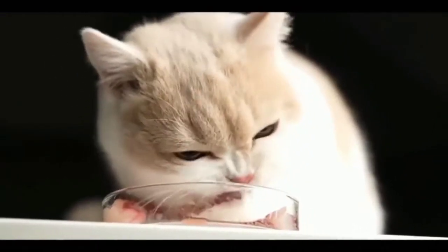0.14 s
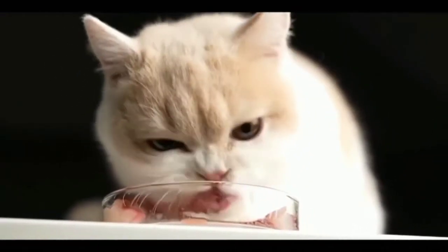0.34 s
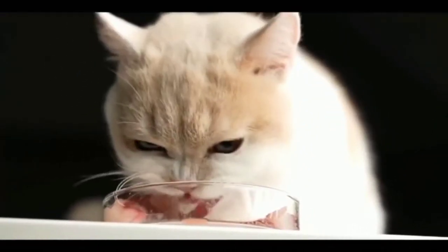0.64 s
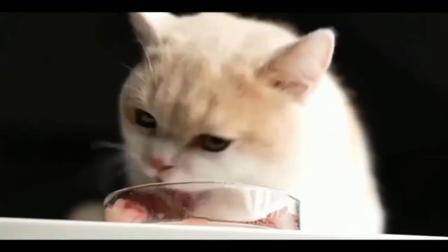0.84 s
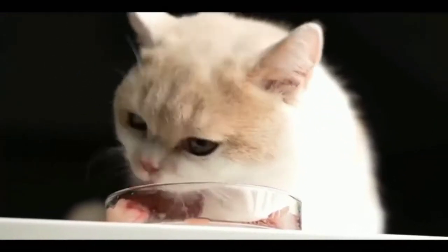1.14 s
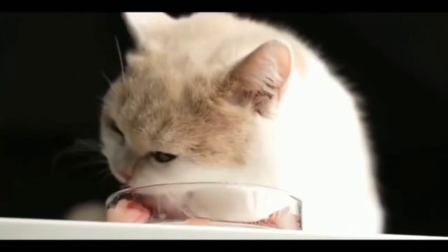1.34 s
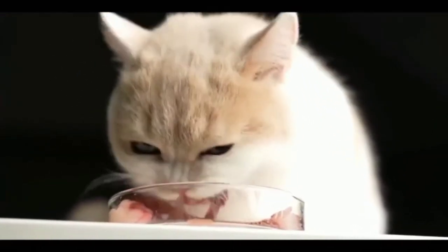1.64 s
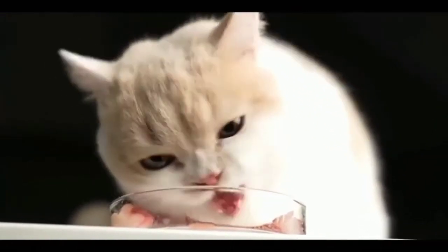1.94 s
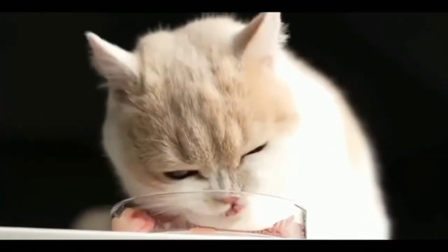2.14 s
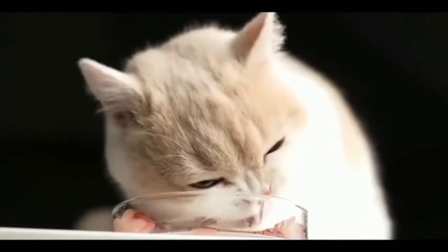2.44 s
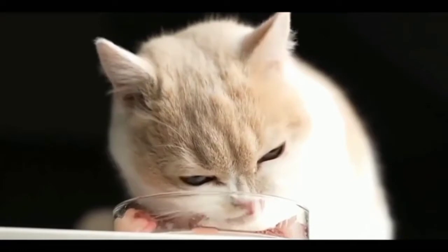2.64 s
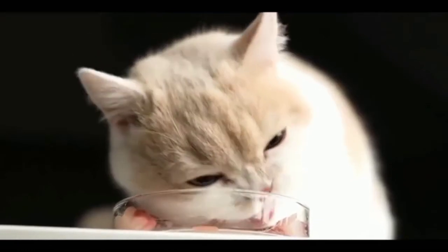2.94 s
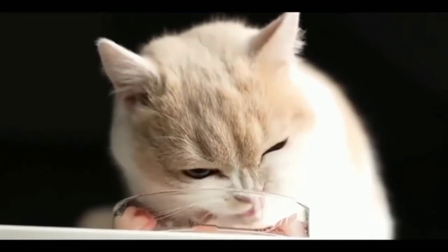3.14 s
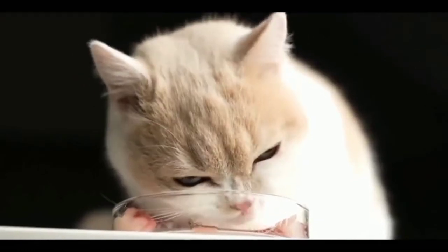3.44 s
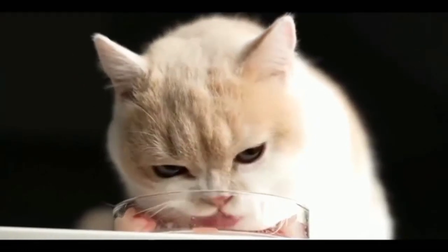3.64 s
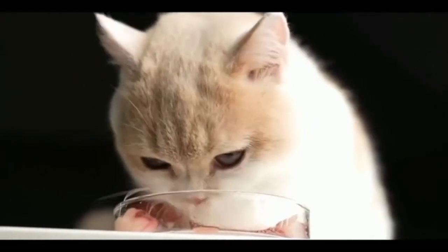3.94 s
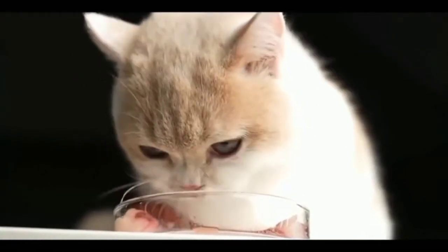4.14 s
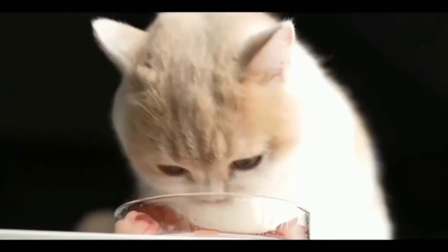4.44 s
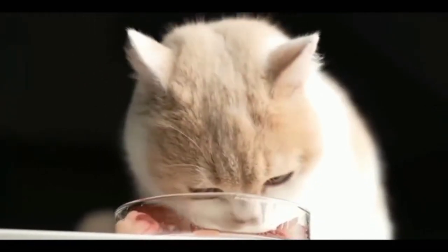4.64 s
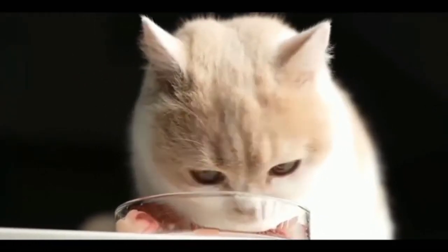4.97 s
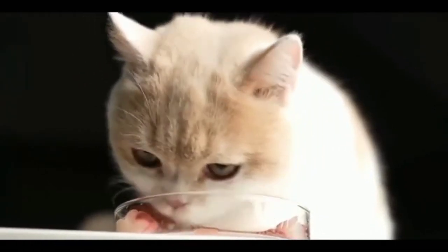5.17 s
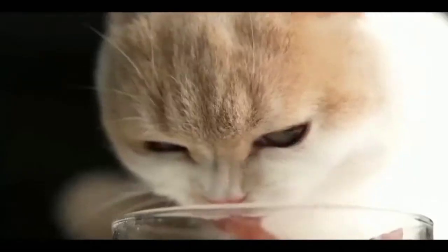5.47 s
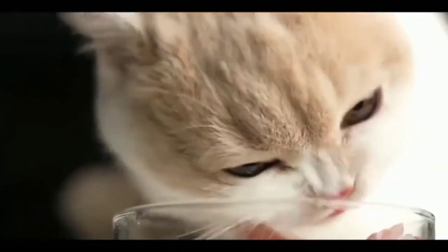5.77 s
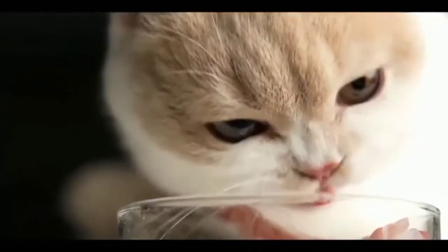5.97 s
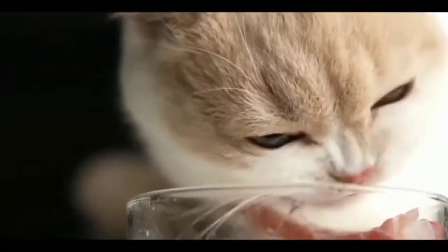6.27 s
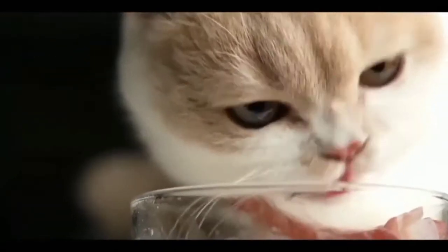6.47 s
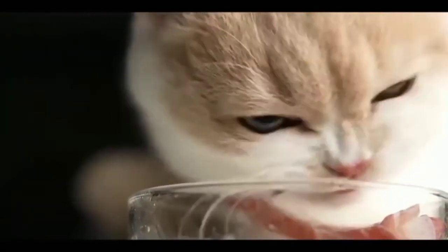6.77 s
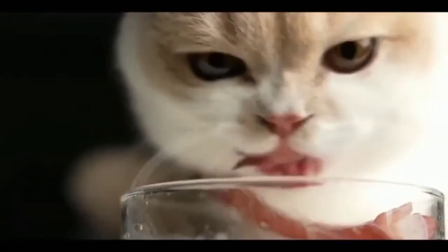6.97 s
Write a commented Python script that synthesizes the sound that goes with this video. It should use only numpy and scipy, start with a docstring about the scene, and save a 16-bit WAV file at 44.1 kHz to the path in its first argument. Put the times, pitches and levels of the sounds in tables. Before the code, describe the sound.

A kitten chews raw meat from a glass dish in a quiet room. Quick, irregular wet pops and sharp saliva clicks run throughout, with crackling, juicy bites and soft squelching between them. Now and then its jaw knocks dully through the dish and table. The chewing eases briefly past the middle, then returns strongly. The microphone is very close, with a short room echo.

```python
"""A kitten chews raw meat with wet pops, each a small break that makes its mouth ring. Saliva ticks, bites
squeeze out crackling juice and the meat squelches in between; now and then a short, narrow hiss sounds high in
the treble. The jaw thuds through a glass dish and the table under it. The microphone is close, so the loudest
clicks overload it. Behind all this are the short echo and faint rumble of a quiet room."""
import sys
import numpy as np
from scipy import signal
from scipy.fft import next_fast_len
from scipy.io import wavfile
from scipy.ndimage import uniform_filter1d

SR = 44100
rng = np.random.default_rng(int(sys.argv[2]) if len(sys.argv) > 2 else 0)


def dump(signal):
    """Clip the signal to [-1, 1] and save it as 16-bit WAV at the path in sys.argv[1]."""
    limited = np.clip(np.atleast_2d(signal).T, -1, 1)
    pcm = np.round(limited * 32767).astype(np.int16)
    wavfile.write(sys.argv[1], SR, pcm)


N = 313551


def undb(db):
    """Turns decibels into a number to multiply by."""
    return 10 ** (np.asarray(db) / 20)


def level(x, db):
    """Sets a sound's average (RMS) level."""
    return x * undb(db) / np.sqrt(np.mean(x ** 2))


def band(x, hz, width_hz):
    """Lets a sound ring around one pitch and turns the rest down."""
    return signal.lfilter(*signal.iirpeak(min(hz, .45 * SR), hz / width_hz, fs=SR), x)


def waver(per_s):
    """A curve that glides to a new random value per_s times a second."""
    step = int(SR / per_s)
    return uniform_filter1d(np.repeat(rng.standard_normal(N // step + 1), step), step)[:N]


def add(out, peak_s, sound, peak_db):
    """Mixes a sound in so that its peak has the given time and level."""
    start = max(int(peak_s * SR) - np.abs(sound).argmax(), 0)
    sound = sound[:N - start]
    out[start:start + len(sound)] += sound * undb(peak_db) / np.abs(sound).max()


def sharp_break(spread_ms, snap):
    """One sharp break, with a spatter of smaller ones just before and after it."""
    t = (np.arange(1024) - 400) / SR / max(spread_ms / 1000, 1e-4)
    spatter = rng.standard_normal(1024) * np.exp(-np.where(t < 0, -0.75 * t, t) ** 2)
    spatter[400] += snap * np.sign(spatter[400])
    return spatter


def grains(samples, per_s, spread_db, hiss):
    """Scattered tiny breaks of unequal size over a wet hiss."""
    hit = rng.random(samples) < per_s / SR
    size_db = spread_db * np.minimum(rng.exponential(size=samples), 4)
    return hit * rng.choice([-1, 1], samples) * undb(size_db) + hiss * rng.standard_normal(samples)


def rumble():
    """A faint, deep rumble comes and goes."""
    flutter = undb(0.98 * waver(53))
    deep_noise = band(band(rng.standard_normal(N), 26, 19.5), 60, 90)
    return level(flutter * deep_noise, db=-67)


# The bands of the room's echo: pitch_hz, width_hz, fade_s (time to fall 60 dB), level_db
ECHO_BANDS = [(230, 250, 0.75, -8.5), (647, 800, 0.26, -14.5), (1730, 1350, 0.61, -13),
              (4900, 7900, 0.49, -16.5), (8050, 8100, 0.016, -6.5)]
def room_echo(x):
    """Dish, table and walls answer with fading noise in which the bass lasts longest."""
    t = np.arange(SR // 2) / SR
    tail = 0
    for pitch_hz, width_hz, fade_s, level_db in ECHO_BANDS:
        fade = undb(-60 * t / fade_s) * (1 - np.exp(-t / 0.0032))
        noise = band(band(rng.standard_normal(len(t)), pitch_hz, width_hz), pitch_hz, 2.17 * width_hz)
        tail = tail + undb(level_db) * noise * fade / np.sqrt(np.sum(fade ** 2))
    echo = signal.fftconvolve(x, tail)[:N]
    # the echo's phase drifts at random, so no pitch rings on
    phase_drift = np.exp(2.5j * waver(25))
    return np.real(signal.hilbert(echo, next_fast_len(N))[:N] * phase_drift)


# Short, high hisses (the one at 6.19 s is a wet lick): middle_s, length_ms, level_db
HIGH_HISSES = [(0.6, 67, -44), (1.31, 28, -37.5), (1.48, 18, -28.5), (3.235, 10, -36), (3.738, 51, -36.5),
               (5.305, 36, -46), (6.191, 46, -35)]
def high_hisses(pitch_hz=7420, width_hz=2200):
    """A narrow, grainy hiss comes and goes high in the treble."""
    t = np.arange(N) / SR
    swells = sum(undb(level_db) * np.exp(-((t - middle_s) / (length_ms / 2000)) ** 4)
                 for middle_s, length_ms, level_db in HIGH_HISSES)
    hiss = grains(N, per_s=3000, spread_db=2, hiss=.4)
    return swells * level(band(band(hiss, pitch_hz, width_hz), pitch_hz, width_hz), 0)


def sizzle(x, pitch_hz=8800, width_hz=6500):
    """The finest wet films burst with a very high fizz."""
    return band(band(x, pitch_hz, width_hz), pitch_hz, width_hz)


# How the highest treble of the sound drops out and returns: time_s, gain_db
TOP_TREBLE_LEVELS = [(0, 7.5), (.6, -1), (1.2, 1), (1.5, 5), (2.15, 2.5), (2.5, -7.5), (3.15, 6),
                     (3.8, -13), (4.0, -1), (4.3, -32), (5.33, -23), (5.4, 4.5), (5.97, 2), (6.25, -30),
                     (6.6, 14), (6.75, -14), (7.11, 10.5)]
def top_treble_db(time_s):
    """How far the highest treble is turned up or down at this time."""
    return np.interp(time_s, *np.transpose(TOP_TREBLE_LEVELS))


# Where the hollow of the mouth and the lip opening ring: pitch_hz, width_hz, gain_db
MOUTH_RINGS = [(755, 810, 0.5), (1957, 1100, -2.5)]
LIP_RINGS = [(2540, 1160, 0.5), (4770, 1510, 3), (5560, 4500, -4.5)]
MOUTH_TOP_HZ, LIP_TOP_HZ = 3840, 7030
def muffled_ring(x, rings, top_hz):
    """Mouth or lips ring, and wet flesh muffles what lies above top_hz."""
    ringing = sum((-1) ** k * undb(gain_db) * band(x, pitch_hz, width_hz)
                  for k, (pitch_hz, width_hz, gain_db) in enumerate(rings))
    return signal.lfilter(*signal.butter(4, top_hz, fs=SR), ringing)


def crackle(rings, top_hz):
    """Each tiny break sets off just one of the rings, so the clicks differ in pitch."""
    clicks = sum(muffled_ring(grains(N, per_s=110, spread_db=4.5, hiss=.075), [ring], top_hz)
                 for ring in rings)
    return level(clicks, 0)


# How loud the meat squelches: time_s, mouth_db, treble_db
SQUELCH_LEVELS = [(0.0, -43.5, -51.5), (0.42, -49.5, -49.5), (0.75, -41.5, -48), (1.62, -43, -46.5),
                  (1.802, -44, -49.5), (2.93, -42, -40.5), (3.15, -47, -45.5), (3.98, -46.5, -46.5),
                  (4.22, -37.5, -57), (5.269, -59.5, -58), (5.6, -38, -48), (5.92, -39, -45.5),
                  (7.11, -51.5, -59)]
def squelch():
    """Juice seeps through the meat as patchy crackle; a wider mouth lets more treble out."""
    t = np.arange(N) / SR
    time_s, mouth_db, treble_db = np.transpose(SQUELCH_LEVELS)
    mouth_gain, treble_gain = (undb(np.interp(t, time_s, db) + 3.5 * waver(45) + 4 * waver(14))
                               for db in (mouth_db, treble_db))
    fizz = grains(N, per_s=400, spread_db=3, hiss=.25)
    mouth = crackle(MOUTH_RINGS, MOUTH_TOP_HZ)
    lips = crackle(LIP_RINGS, LIP_TOP_HZ)
    films = level(sizzle(fizz) * undb(1.7 * waver(3.8)), -16.5) * undb(top_treble_db(t))
    return mouth_gain * mouth + treble_gain * (lips + films)


# Blows of the jaw on dish and table: peak_s, peak_db
JAW_BLOWS = [(0.073, -33), (0.636, -17), (0.7237, -18.5), (0.9274, -26), (0.963, -18), (1.3656, -15),
             (1.408, -24), (1.49, -26.5), (1.5295, -23.5), (1.65, -18.5), (1.768, -21), (2.137, -18.5),
             (2.189, -30), (2.3233, -26.5), (2.363, -19.5), (2.616, -23.5), (2.768, -33), (3.0969, -22),
             (3.498, -12), (3.579, -15.5), (3.6031, -21), (4.0343, -17), (4.2014, -16.5), (4.2583, -20),
             (4.5413, -7), (5.482, -17.5), (5.9359, -23.5), (6.13, -32), (7.0982, -15)]
def jaw_thuds(table_hz=243.5, pitch_scatter=.13):
    """A blow gives dish and table a low note that dies fast; its hard edge knocks higher up."""
    out, t = np.zeros(N), np.arange(4096) / SR
    for peak_s, peak_db in JAW_BLOWS:
        pitch_hz = table_hz * (1 + pitch_scatter * rng.standard_normal())
        body = np.sin(2 * np.pi * pitch_hz * t) * (t / 0.00065) ** 0.9 * np.exp(-t / 0.00267)
        edge = np.sin(2 * np.pi * 2.3 * pitch_hz * t) * np.exp(-t / 0.003)
        thud = np.convolve(body + undb(-3) * edge, sharp_break(spread_ms=1.5, snap=12))
        add(out, peak_s, thud, peak_db)
    return out


# Bites that squeeze out juice: middle_s, length_ms, mouth_db, pitch_hz, treble_db
JUICY_BITES = [(0.026, 31, -74, 1560, -34), (0.085, 26, -24, 1740, -47), (0.636, 29, -25.5, 1520, -29.5),
               (0.963, 19, -17.5, 1240, -45), (1.009, 64, -27, 644, -28), (1.359, 35, -17, 606, -25),
               (1.602, 9.2, -26.5, 730, -20.5), (1.693, 54, -25.5, 1340, -38),
               (2.077, 32.3, -17.5, 610, -24.5), (2.232, 10.6, -18.5, 2150, -51),
               (2.494, 14, -21, 1890, -33), (2.531, 13, -17.5, 556, -14), (2.555, 100, -32.5, 1490, -31.5),
               (3.065, 20, -18.5, 1480, -22), (3.109, 13.3, -27, 1740, -17.5),
               (3.211, 4.8, -15.5, 1500, -20), (3.412, 50, -25, 1980, -54), (3.498, 25, -15, 690, -18.5),
               (3.824, 28, -25.5, 2060, -54), (3.857, 22, -21.5, 2080, -33), (4.1, 37, -18, 1730, -28.5),
               (4.194, 27.4, -17.5, 670, -58), (4.749, 31, -27.5, 1800, -28.5), (5.021, 18, -29, 2160, -28),
               (5.297, 28, -59, 2120, -31.5), (5.381, 20, -32, 1680, -35), (5.652, 5.5, -12, 810, -15),
               (5.763, 9.2, -13, 1460, -45), (5.973, 9.2, -16, 1400, -22), (6.271, 220, -31, 1750, -40),
               (6.272, 14.2, -17, 2070, -10), (6.678, 66, -33, 740, -32.5), (6.734, 48, -27, 1530, -28.5),
               (6.777, 16, -29, 1950, -21.5)]
def bites():
    """A burst of sticky snaps swells and fades, ringing the mouth and the lip opening."""
    samples, half = 8192, 4096
    out, t = np.zeros(N + samples), (np.arange(samples) - half) / SR
    for middle_s, length_ms, mouth_db, pitch_hz, treble_db in JUICY_BITES:
        snaps, fibres, fizz = (grains(samples, per_s=600, spread_db=4, hiss=.11) for _ in range(3))
        ring = band(band(snaps, pitch_hz, .5 * pitch_hz), pitch_hz, pitch_hz)
        mouth = level(ring + undb(-5) * muffled_ring(snaps, MOUTH_RINGS, MOUTH_TOP_HZ), mouth_db)
        lips = level(muffled_ring(0.2 * snaps + fibres, LIP_RINGS, LIP_TOP_HZ), treble_db)
        films = level(sizzle(fizz), treble_db - 11 + top_treble_db(middle_s))
        swell = np.exp(-np.abs(t / (0.53 * length_ms / 1000)) ** 1.65)
        start = int(middle_s * SR)
        out[start:start + samples] += (mouth + lips + films) * swell
    return out[half:N + half]


# Snaps of saliva and sinew: peak_s, peak_db, pitch_hz
SALIVA_TICKS = [(0.0296, -7.5, 5960), (0.1028, -19, 4730), (0.1082, -10.5, 4700), (0.3303, -19.5, 7850),
                (0.405, -17, 3030), (0.423, -2.5, 4500), (0.4655, -13.5, 5400), (0.5807, -7.5, 8100),
                (0.7923, -18, 3730), (0.8028, -8.5, 4300), (0.9517, -11.5, 3300), (1.0257, -6, 4940),
                (1.1425, -13.5, 5700), (1.18, -10, 5100), (1.1858, -6.5, 5640), (1.369, -3.5, 4870),
                (1.4163, -23, 3900), (1.4562, -1.5, 4900), (1.4651, -13, 4700), (1.4825, -8, 6100),
                (1.5484, -9, 5940), (1.615, -8.5, 4900), (1.65, -11, 4770), (1.6582, -13, 4800),
                (1.6773, -9.5, 4900), (1.777, -15.5, 4470), (1.8388, -8, 4460), (1.8904, -18, 4630),
                (1.9464, -6, 4230), (1.967, -8, 5860), (2.057, -9, 4300), (2.1824, -18.5, 3660),
                (2.3227, -4, 3600), (2.3266, 0.5, 4700), (2.461, -15, 3770), (2.533, -2.5, 4180),
                (2.5652, -7, 4630), (2.574, -10, 3900), (2.836, -19, 10900), (2.889, -6.5, 7500),
                (2.9632, -5.5, 6200), (3.0651, -3.5, 2800), (3.084, -14, 3710), (3.1137, -5.5, 5360),
                (3.1378, -14, 5600), (3.178, -14, 5100), (3.2046, -17, 4060), (3.2696, -3.5, 4300),
                (3.384, -17.5, 2820), (3.4587, -20, 3210), (3.469, -24, 3250), (3.4886, -5.5, 3006),
                (3.5404, -11, 4170), (3.628, -7, 3210), (3.6871, -6, 3800), (3.697, -7, 4100),
                (3.7194, -10.5, 4530), (3.7728, -3.5, 3520), (3.7854, -13, 3800), (3.8568, -8.5, 3280),
                (3.8676, -12, 3400), (3.8976, -21, 3200), (3.968, -18, 3580), (3.9925, -1, 4560),
                (4.111, -6, 4050), (4.153, -17.5, 4100), (4.438, -20.5, 3940), (4.5478, -9.5, 2900),
                (4.7542, -13, 2880), (4.9996, -13.5, 2940), (5.0253, -16, 3470), (5.248, -20.5, 3440),
                (5.437, -18, 5200), (5.661, -8, 6100), (5.6676, -4.5, 6400), (5.7518, -8, 4900),
                (5.7613, -0.5, 5700), (5.7683, -5.5, 5340), (5.783, -12, 4860), (5.846, -14.5, 7800),
                (5.9688, 2.5, 6670), (5.9762, 0.5, 7300), (6.0603, -8.5, 4650), (6.0742, -20, 4440),
                (6.206, -9, 8170), (6.2427, -6, 4430), (6.2498, 2, 4660), (6.286, -1, 4770),
                (6.2997, -2, 4560), (6.4253, -5, 4360), (6.5195, -8.5, 5400), (6.5352, -11.5, 4260),
                (6.6174, -9.5, 7200), (6.695, -12, 5140), (6.7046, -11.5, 5600), (6.7414, -10, 4380),
                (6.775, -15, 4170), (6.8343, 0.5, 4790), (6.9214, -4, 6350), (6.939, -14, 4100),
                (6.9485, -0.5, 4480), (6.959, -2.5, 4480), (7.003, -14.5, 5020), (7.0614, -6, 6530)]
def saliva_ticks():
    """Tiny films and fibres part: a brief high ring, the tone of the lips and a trace of sizzle."""
    out = np.zeros(N)
    for peak_s, peak_db, hz in SALIVA_TICKS:
        click = sharp_break(spread_ms=.85, snap=5)
        ring = band(band(band(click, hz, 0.31 * hz), hz, 0.55 * hz), hz, hz)
        lips = undb(-14.5) * muffled_ring(click, LIP_RINGS, LIP_TOP_HZ)
        films = undb(-24 + top_treble_db(peak_s)) * sizzle(click)
        add(out, peak_s, ring + lips + films, peak_db)
    return out


# Wet pops inside the mouth: peak_s, peak_db, pitch_hz
MOUTH_POPS = [(0.0868, -14, 1660), (0.2413, -21.5, 805), (0.273, -18, 650), (0.2835, -22.5, 740),
              (0.4045, -17, 2010), (0.422, -17, 2310), (0.5227, -18, 2030), (0.5535, 1.5, 993),
              (0.7239, -15.5, 696), (0.7923, -11.5, 880), (0.7992, -10, 945), (0.843, 3, 1745),
              (0.8675, -12, 1490), (0.9524, -4.5, 1500), (1.0073, -8, 590), (1.183, -3.5, 1930),
              (1.3354, -8.5, 1040), (1.3531, -8, 720), (1.6158, -14, 2210), (1.651, -3, 1730),
              (1.6782, -3.5, 676), (1.769, -12, 1280), (1.8891, -8.5, 1800), (1.9459, -1.5, 1420),
              (1.9666, 1, 1620), (2.0563, -4.5, 1280), (2.1377, -15.5, 970), (2.2287, -3, 1890),
              (2.3257, -11.5, 1810), (2.3586, -17.5, 1060), (2.461, -24, 1700), (2.491, -10.5, 1660),
              (2.565, -9, 2060), (2.586, -6.5, 1830), (2.671, -16.5, 827), (2.7398, -17.5, 786),
              (2.7663, -13.5, 775), (2.826, -19.5, 1760), (2.8883, -5, 1830), (2.9623, -3, 1660),
              (3.012, -16, 1710), (3.046, -15, 1500), (3.0836, -3, 1540), (3.2044, -11.5, 1630),
              (3.2705, -14, 1710), (3.5117, -7, 1620), (3.5768, -7.5, 710), (3.6278, -16, 1950),
              (3.7197, -6.5, 1910), (3.7727, -7, 2450), (3.8234, -5, 1830), (3.8575, -4, 2200),
              (3.986, -10.5, 2430), (3.9922, -6, 2080), (4.0241, -15, 2550), (4.0665, -18, 1840),
              (4.0993, -12, 844), (4.171, -6, 2200), (4.2594, -19, 457), (4.3337, -10.5, 1780),
              (4.463, -2.5, 1780), (4.5405, -5.5, 575.3), (4.6647, -17.5, 1870), (4.7175, -14, 2300),
              (4.7321, -15, 2100), (4.755, -8, 710), (4.8177, -19.5, 1680), (4.9989, -10, 2600),
              (5.113, -20.5, 2450), (5.274, -20, 2600), (5.438, -12, 1560), (5.6485, 1, 866),
              (5.7521, -4, 1030), (5.7603, -4, 1500), (5.767, -11, 1330), (5.8651, -15, 1280),
              (5.933, -13.5, 611), (5.9688, -7, 1932), (6.061, -11, 2580), (6.3002, -15, 2370),
              (6.4247, -8.5, 2080), (6.5194, -3, 1530), (6.5357, -12.5, 1790), (6.6739, -12.5, 623),
              (6.6961, -18, 1010), (6.749, -10.5, 1770), (6.783, -15, 1800), (6.9186, -10, 2616),
              (6.9397, -11, 2620), (6.949, -9.5, 1710), (6.959, -6.5, 2230), (7.002, -17, 2610)]
def mouth_pops():
    """Each break briefly rings the hollow of the mouth at its own pitch, with a little crack."""
    out = np.zeros(N)
    for peak_s, peak_db, hz in MOUTH_POPS:
        click = sharp_break(spread_ms=1800 / hz, snap=4.5)
        ring = band(band(band(click, hz, .25 * hz), hz, hz), hz, 1.5 * hz)
        crack = undb(-16) * muffled_ring(click, MOUTH_RINGS, MOUTH_TOP_HZ)
        add(out, peak_s, ring + crack, peak_db)
    return out


def scene():
    """Mixes the chewing, its echo and the rumble into one channel."""
    wet = mouth_pops() + saliva_ticks() + bites() + squelch() + high_hisses()
    chewing = signal.sosfilt(signal.butter(4, 330, "high", fs=SR, output="sos"), wet) + jaw_thuds()
    # the microphone drops the bass below the table's note
    bass_cut = signal.butter(7, 150, "high", fs=SR, output="sos")
    heard = signal.sosfilt(bass_cut, chewing + room_echo(chewing))
    return (heard + rumble())[None]


def record(dry):
    """The loudest clicks overload and are flattened; then the highest treble is cut."""
    top_hz = 15300
    treble_cut = signal.ellip(10, .2, 95, top_hz, fs=SR, output="sos")
    return signal.sosfilt(treble_cut, np.clip(dry, -1, 1))


dry = scene()
out = record(dry)
dump(out)
```